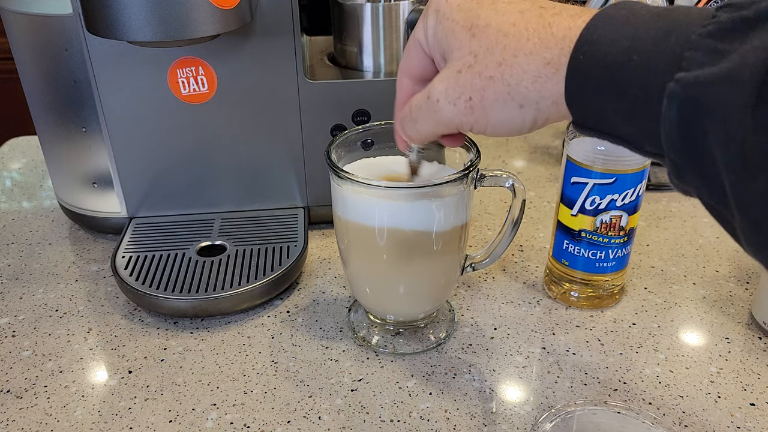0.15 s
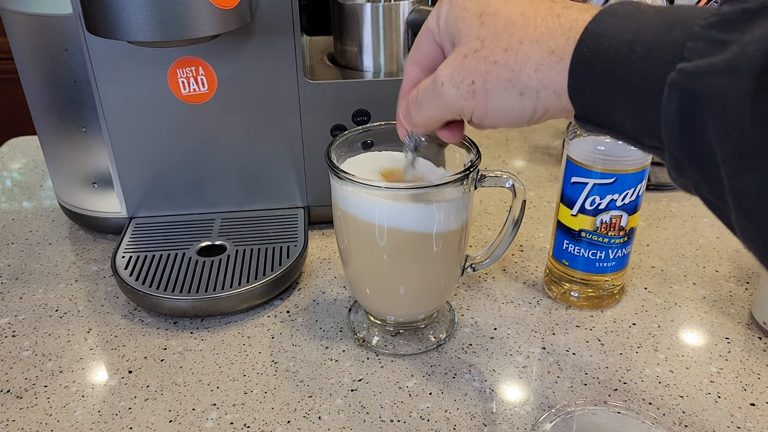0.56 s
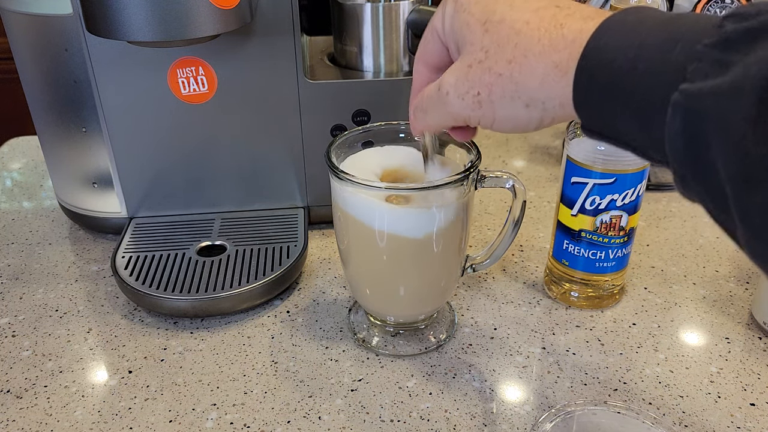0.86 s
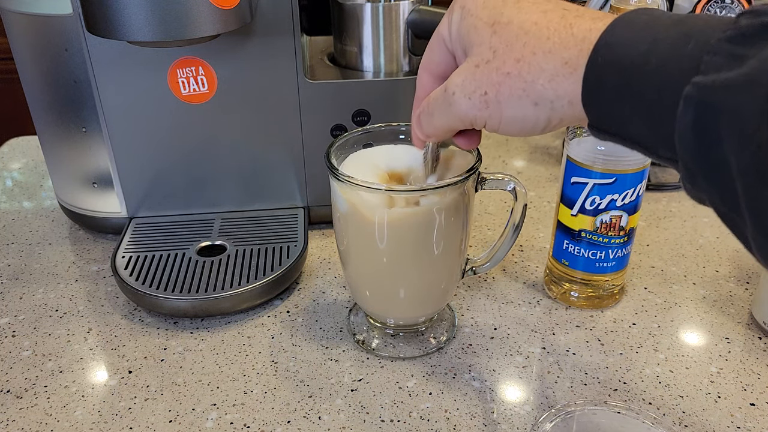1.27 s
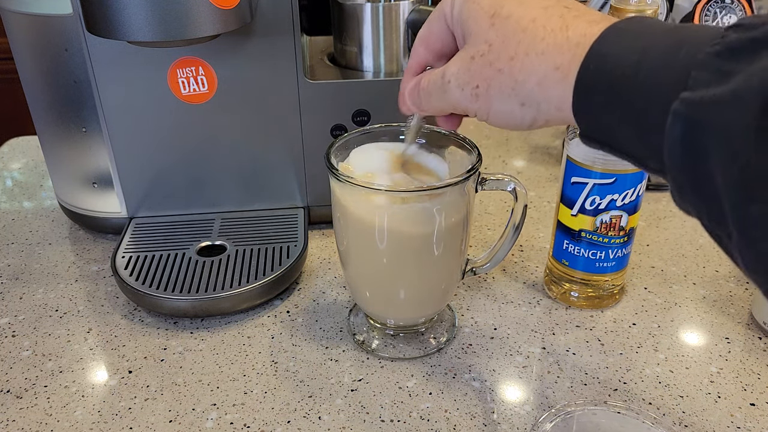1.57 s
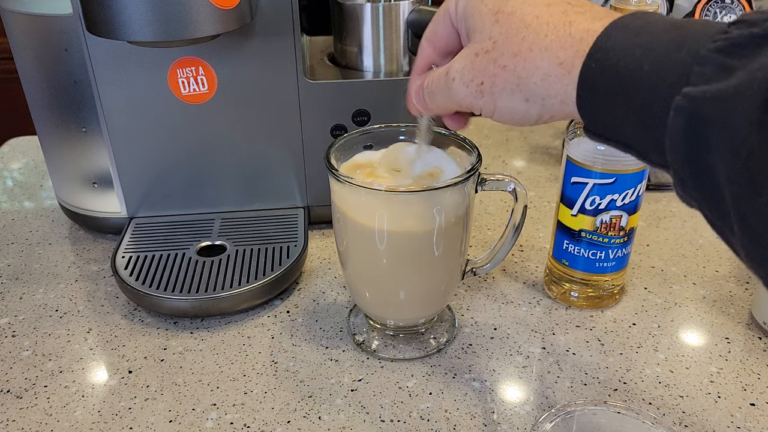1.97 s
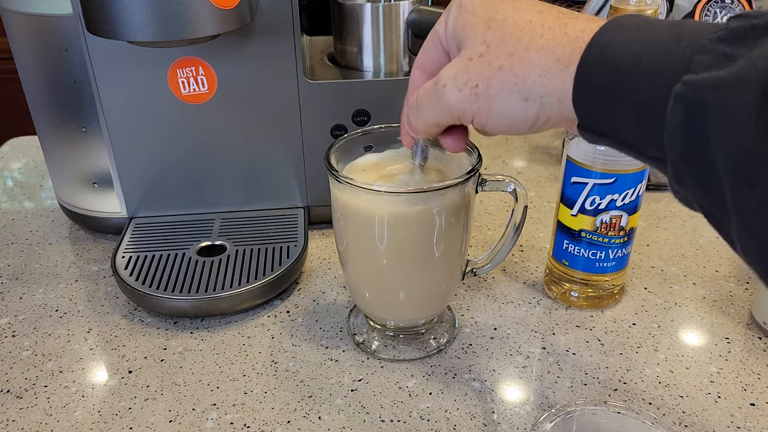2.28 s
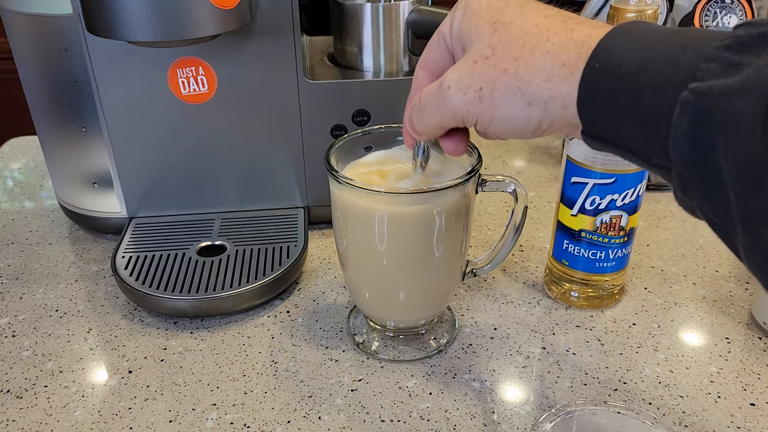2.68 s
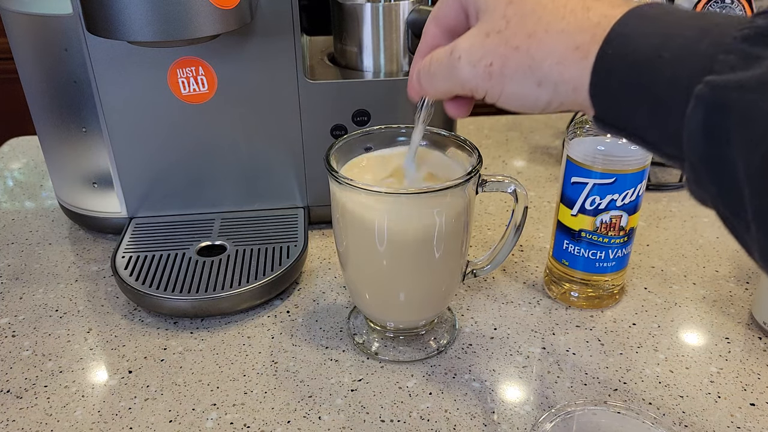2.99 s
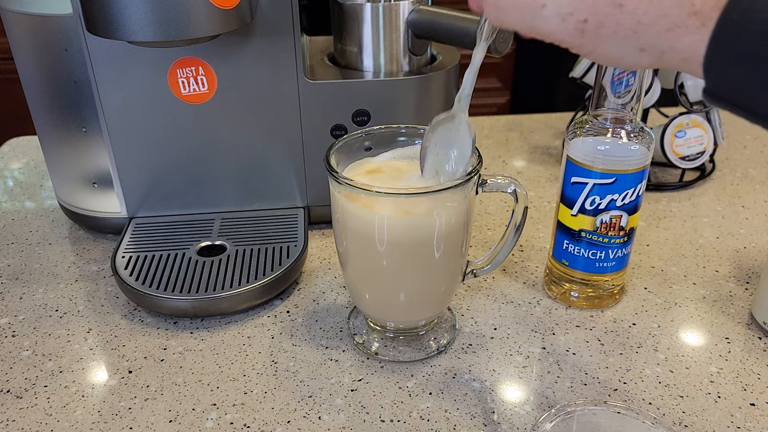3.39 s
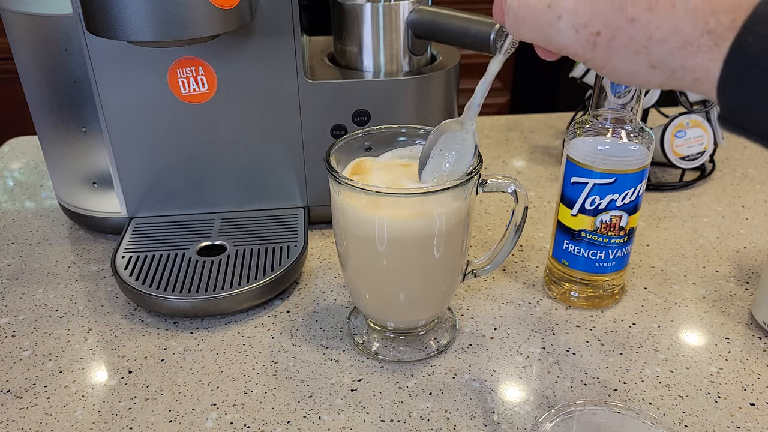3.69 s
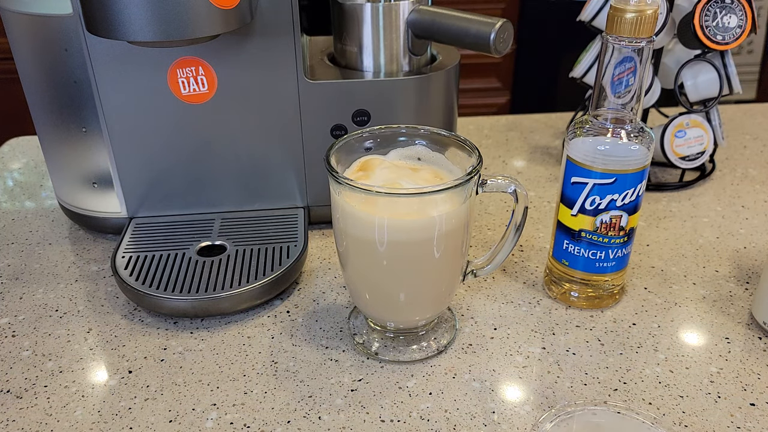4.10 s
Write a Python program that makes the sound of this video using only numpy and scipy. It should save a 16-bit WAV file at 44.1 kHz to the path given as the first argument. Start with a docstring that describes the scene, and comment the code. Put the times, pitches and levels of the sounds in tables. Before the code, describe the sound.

A metal spoon stirs a hot drink in a glass mug with quick, soft clinks, then taps three times on the rim.

```python
"""Quick, soft clinks circle in a glass: a metal spoon stirs a hot milky drink in a footed mug.
The spoon clinks on the wall and knocks dully along the bottom; the drink damps the glass to a short,
low ring. Then the spoon judders up the wall and is tapped three times on the rim, where it rings freely
and the foot clatters on the stone counter. A small kitchen answers each blow over a soft rumble."""
import sys
import numpy as np
from scipy import signal
from scipy.fft import rfft, irfft
from scipy.io import wavfile
from scipy.ndimage import uniform_filter1d

SR = 44100
rng = np.random.default_rng(int(sys.argv[2]) if len(sys.argv) > 2 else 0)


def unload_audio(sound):
    """Save the sound as a 16-bit wav file, at the path given as the first command line argument."""
    columns = np.transpose(np.atleast_2d(sound))
    # keep every value between -1 and 1, then stretch to whole-number steps
    steps = np.round(np.clip(columns, -1, 1) * 32767)
    wavfile.write(sys.argv[1], SR, steps.astype(np.int16))


N = 187425
AGE = np.arange(SR // 2) / SR   # seconds since a blow


def amp(db):
    """Decibels to gain."""
    return 10 ** (np.asarray(db) / 20)


def at_hz(points, hz):
    """Read a table on a log-frequency axis."""
    f, value = np.transpose(points)
    return np.interp(np.log(np.maximum(hz, 1)), np.log(f), value)


def decay(t60):
    """An envelope that falls 60 dB in t60 seconds."""
    return np.exp(-np.log(1000) * AGE / t60)


def low_pass(x, hz, order):
    """Roll off the treble above hz."""
    return signal.sosfilt(signal.butter(order, min(hz, .45 * SR), fs=SR, output="sos"), x)


def band_pass(x, low_hz, high_hz, order):
    """Roll off both sides of a band."""
    edges_hz = [low_hz, min(high_hz, .45 * SR)]
    return signal.sosfilt(signal.butter(order, edges_hz, "band", fs=SR, output="sos"), x)


def noise(spectrum, count, size):
    """Rows of coloured noise, rms 1."""
    colour = amp(at_hz(spectrum, np.fft.rfftfreq(size, 1 / SR)))
    x = irfft(rfft(rng.standard_normal((count, size))) * colour, size)
    return x / x.std()


def modal(modes, count, scatter_db):
    """One ring per blow; the point of contact weights the modes differently each time."""
    hz, db, t60 = np.transpose(modes)
    rings = np.sin(2 * np.pi * hz[:, None] * AGE) * decay(t60[:, None])
    return amp(db + scatter_db * rng.standard_normal((count, len(hz)))) @ rings


def burst(spectrum, count, t60, rise_s):
    """Many crowded, quickly damped modes: noise that swells at once and dies."""
    return noise(spectrum, count, len(AGE)) * decay(t60) * (1 - np.exp(-AGE / rise_s))


def play(times, levels_db, sounds):
    """Lay each sound at its time, with its loudest 3 ms at its level."""
    loudest = np.sqrt(uniform_filter1d(sounds[:, :2000] ** 2, 130, axis=1).max(axis=1))
    out = np.zeros(N + len(AGE))
    for s, gain, sound in zip(times, amp(levels_db) / loudest, sounds):
        start = int(np.clip(s * SR, 0, N))
        out[start:start + len(AGE)] += gain * sound
    return out[:N]


def room_tone():
    """A bed of soft rumble and hiss that drifts in level."""
    # The bed's colour. Each row: frequency in Hz, relative level in dB.
    colour = [(25, -51), (60, -20), (110, -18.5), (170, 0.5), (300, -4.5), (520, 1.5), (750, -10.5),
              (1100, -18.5), (1800, -39), (3000, -36), (5200, -27), (8000, -43.5), (16000, -57)]
    # Its fader ride. Each row: time in seconds, level in dB.
    ride = [(0, -54), (.65, -65.5), (2, -50), (3.2, -52), (4.25, -55.5)]
    s, level_db = np.transpose(ride)
    return amp(np.interp(np.arange(N) / SR, s, level_db)) * noise(colour, count=1, size=N)[0]


def kitchen(x):
    """Dense reflections from counter, cupboards and walls, each octave dying at its own rate."""
    # The reverb's length. Each row: frequency in Hz, t60 in seconds.
    tail_t60 = [(150, 0.35), (500, 0.34), (1200, 0.37), (5000, 0.44), (9000, 0.36), (15000, .22)]
    # How much the kitchen sends back. Each row: frequency in Hz, level in dB.
    send = [(100, -1), (400, -4.5), (860, -12.5), (1300, -3.5), (2500, -1.5), (6000, -10.5), (15000, -3.5)]
    hz = np.fft.rfftfreq(len(AGE), 1 / SR)
    spectrum = rfft(rng.standard_normal(len(AGE))) * amp(at_hz(send, hz))
    centres = np.geomspace(125, 16000, 8)
    response = 0
    for centre, solo in zip(centres, np.eye(len(centres))):
        envelope = decay(at_hz(tail_t60, centre)) * (1 - np.exp(-(AGE / 0.0022) ** 2))
        octave = irfft(spectrum * at_hz(np.c_[centres, solo], hz), len(AGE))
        response = response + octave * envelope / np.linalg.norm(envelope)
    return signal.fftconvolve(x, response)[:N]


def corner(x):
    """Standing waves between counter and cupboards pick up each blow and hum on after it."""
    # Each row: pitch in Hz, level against the direct sound in dB, t60 in seconds.
    standing_waves = [(132, -4, 0.44), (277, 1, .35), (364, -13, 0.13), (473, 2.5, 0.17), (751, -1.5, 0.48),
                      (1014, -5, .33), (1140, -11.5, 0.77), (1198, 1, .24), (1300, -22, 0.11),
                      (1475, -10, 0.1), (1678, 2.5, 0.12), (1960, -5, 0.21)]
    out = 0
    for hz, level_db, t60 in standing_waves:
        r = amp(-60 / (t60 * SR))   # decay per sample
        feed = (1 - r * r) / 2 * np.array([1, 0, -1])
        feedback = [1, -2 * r * np.cos(2 * np.pi * hz / SR), r * r]
        out = out + amp(level_db) * signal.lfilter(feed, feedback, x)
    return out


def thud(times, levels_db):
    """The push goes through the foot into the counter, which radiates no deep bass."""
    # The thud's colour. Each row: frequency in Hz, relative level in dB.
    colour = [(80, -23), (130, -5), (200, -12.5), (320, 4), (450, 2), (650, 4), (1000, 6), (2000, -13)]
    pushes = burst(colour, len(times), t60=0.038, rise_s=0.0016)
    return play(times, levels_db, band_pass(pushes, 160, 1600, order=3))


def glass(times, levels_db, contact_hz, swell_s, bump_db):
    """The wall gives way in a damped bump, then rings briefly; a soft contact dulls its upper modes."""
    # The filled mug's modes. Each row: pitch in Hz, relative level in dB, t60 in seconds.
    mug_modes = [(488.4, -33, 0.13), (723, -13, 0.043), (872, 2.5, 0.064), (1090, -2, 0.015),
                 (1230, -14.5, 0.045), (1281, -6, 0.022), (1460, -29, 0.097), (1909, -32.5, 0.034),
                 (2267, -29.5, 0.033), (2960, -29.5, 0.031), (3307, -33, 0.045), (3915, -37.5, .03)]
    bump_hz = 905 * np.exp(0.073 * rng.standard_normal((len(times), 1)))   # set by the spot that is hit
    bump = amp(bump_db) * np.sin(2 * np.pi * bump_hz * AGE) * decay(t60=0.019)
    rings = (bump + modal(mug_modes, len(times), scatter_db=3.5)) * (1 - np.exp(-AGE / swell_s))
    return play(times, levels_db, low_pass(rings, contact_hz, order=4))


def swirl():
    """The drink swishes round while the spoon skips over the bottom in tiny random bumps."""
    # The strength of the stirring. Each row: time in seconds, level of the swish in dB.
    stir = [(0, -58.5), (.6, -61.5), (.9, -58), (1.5, -52), (2.1, -56.5), (2.699, -51), (3.05, -50),
            (3.25, -54.5), (3.4, -67.5), (4.25, -75)]
    # The swish's colour. Each row: frequency in Hz, relative level in dB.
    colour = [(60, -9), (170, 2), (450, -0.5), (650, 10), (880, 1.5), (1100, 5.5), (1350, 4), (1700, -18.5),
              (2200, -44), (3000, -26.5), (5000, -45.5), (9000, -44), (16000, -65)]
    s, level_db = np.transpose(stir)
    swish = amp(np.interp(np.arange(N) / SR, s, level_db)) * noise(colour, count=1, size=N)[0]
    slots = np.linspace(0, s[-1], num=120)
    times = slots + rng.uniform(0, slots[1], len(slots))
    skips_db = np.interp(times, s, level_db) + 12 + 3 * rng.standard_normal(len(times))
    return swish + glass(times, skips_db, contact_hz=1680, swell_s=0.00022, bump_db=17)


def knocks(s, ring_db):
    """The round of the spoon's bowl bumps the glass without a tick."""
    return glass(s, ring_db, contact_hz=1780, swell_s=0.0015, bump_db=9.5) + thud(s, ring_db - 16.5)


def stirring_knocks():
    """The bowl often bumps the glass just before it reaches the wall, now and then just after."""
    # Each row: start in seconds, glass ring in dB.
    hits = [(0.367, -37.5), (0.827, -31), (0.932, -29.5), (1.022, -25.5), (1.055, -26), (1.116, -32.5),
            (1.202, -27.5), (1.306, -29.5), (1.505, -25.5), (1.594, -23), (1.698, -24.5), (1.789, -22),
            (1.995, -20), (2.196, -27.5), (2.398, -24), (2.596, -21.5), (2.795, -25.5), (2.821, -30.5)]
    return knocks(*np.transpose(hits))


def judder():
    """An even run of ever lighter knocks as the spoon is drawn up the wall, out of the drink."""
    start_s, gap_s, first_db, loss_db = 2.9035, 0.045, -27, 3.5
    touch = np.arange(7)
    return knocks(start_s + gap_s * touch, first_db - loss_db * touch)


def tick(spectrum, centres_hz, t60, boost_db):
    """Metal on glass: where the spoon is touched decides which of its resonances stands out."""
    cracks = burst(spectrum, len(centres_hz), t60, rise_s=0.00009)
    peaks = [band_pass(x, hz - 350, hz + 350, order=1) for x, hz in zip(cracks, centres_hz)]
    return cracks + amp(boost_db) * np.array(peaks)


def soften(ticks, levels_db):
    """A harder blow is a shorter contact, hence brighter; light touches lose their highest treble."""
    reference_hz, reference_db, db_per_octave = 11600, -28, 20.5
    top_hz = reference_hz * 2 ** ((levels_db - reference_db) / db_per_octave)
    return np.array([low_pass(x, hz, order=1) for x, hz in zip(ticks, top_hz)])


def wall_contacts(s, ring_db, tick_db, thud_db, centre_hz):
    """The edge of the spoon meets the wall and skips once; drink and fingers choke the metal at once."""
    # The colour of the sunken spoon's tick. Each row: frequency in Hz, relative level in dB.
    colour = [(300, -16), (1200, -6), (2200, -1.5), (2750, -29.5), (3800, -6), (4450, 4), (5200, -2),
              (5900, -7.5), (6750, 1), (7600, -3.5), (9000, 0), (10500, -9), (12800, -7.5), (13600, -18),
              (16000, -13)]
    cracks = tick(colour, centre_hz, t60=0.019, boost_db=2)
    metal = play(s, tick_db, soften(cracks, tick_db))
    rebound_s = s + rng.uniform(0.0018, 0.016, len(s))
    rebound_db = tick_db - 14.5
    rebounds = burst(colour, len(s), t60=0.043, rise_s=0.001)
    skip = play(rebound_s, rebound_db, soften(rebounds, rebound_db))
    ring = glass(s + 0.00031, ring_db, contact_hz=4230, swell_s=0.0015, bump_db=1.5)
    return metal + skip + ring + thud(s, thud_db)


def glances():
    """The edge glances off the wall, mostly half a turn after a clink, with a thud as loud as its tick."""
    # Each row: start in seconds, metal tick in dB, glass ring in dB.
    hits = [(0.1933, -49.5, -59), (0.4073, -47, -39), (0.5679, -52.5, -53), (0.7767, -45.5, -39),
            (0.9624, -39, -30), (1.1645, -43.5, -33), (1.3458, -38.5, -29.5), (1.5349, -34.5, -34),
            (1.7253, -31.5, -33), (1.9185, -32.5, -34), (2.015, -42, -22), (2.1349, -32.5, -50),
            (2.2098, -43.5, -35), (2.342, -34.5, -27.5), (2.5379, -37, -27), (2.7491, -43.5, -39.5)]
    s, tick_db, ring_db = np.transpose(hits)
    centre_hz = 5340 * 2 ** (0.056 * rng.standard_normal(len(s)))
    return wall_contacts(s, ring_db, tick_db, tick_db + 0.5, centre_hz)


def clinks():
    """Once a turn, about five times a second, the spoon meets the wall squarely: mostly glass."""
    # Each row: start in seconds, glass ring in dB, accented spoon resonance in Hz.
    hits = [(0.1096, -35.5, 4540), (0.293, -37, 4700), (0.4817, -38.5, 4900), (0.6834, -32, 4370),
            (0.8591, -31.5, 4300), (1.0457, -28, 5340), (1.2417, -20.5, 4250), (1.4358, -18.5, 6750),
            (1.629, -15, 6740), (1.831, -10.5, 3600), (2.0294, -21, 4800), (2.231, -23.5, 7200),
            (2.4316, -20.5, 4700), (2.607, -27, 7800), (2.8103, -28, 7900)]
    s, ring_db, centre_hz = np.transpose(hits)
    # The last few clinks are duller, with less metal tick against the glass ring.
    dull_from_s, dull_db_per_s = 2.18, 6
    tick_db = ring_db - 12.5 - dull_db_per_s * np.maximum(s - dull_from_s, 0)
    thud_db = -29.5 + 0.47 * (ring_db + 27)   # grows more slowly than the ring
    return wall_contacts(s, ring_db, tick_db, thud_db, centre_hz)


def rim_taps():
    """Three taps on the rim: the free spoon rings on, and the mug clatters on its foot."""
    # Each row: start in seconds; glass ring, metal tick, thud, spoon ring and foot clatter, all in dB;
    # accented spoon resonance in Hz.
    taps = [(3.2889, -9, -25, -32.5, -26, -25, 7300), (3.4504, -13, -23, -26.5, -28, -20, 8630),
            (3.608, -15, -20, -10.5, -25, -14, 4600)]
    # The colour of the tick on the rim. Each row: frequency in Hz, relative level in dB.
    colour = [(200, -24), (1200, 0.5), (2000, 6.5), (2600, 0), (3500, -8), (4500, 4.5), (5100, -2),
              (5600, 6.5), (6650, -15.5), (7300, 8), (8200, -1.5), (9900, -0.5), (10700, -14),
              (14000, -16.5), (16000, -20)]
    # The spoon ringing in the air. Each row: pitch in Hz, relative level in dB, t60 in seconds.
    spoon_modes = [(2240, -5, .09), (4123, -8, .14), (4555, -3, .05), (5480, -1, .13), (5575, -3, .07),
                   (7105, -1, .14), (7260, -2, .05), (7816, -6, .07), (9625, -7, .09), (10970, -16, .07),
                   (13490, -17, .11)]
    # The foot rattling on the stone. Each row: pitch in Hz, relative level in dB, t60 in seconds.
    foot_modes = [(436, -1.5, 0.062), (744, -0.5, 0.078), (1038, -7.5, 0.083), (1221, 6.5, 0.024),
                  (1402, 0.5, 0.022), (1730, -4, 0.016)]
    s, ring_db, tick_db, thud_db, spoon_db, foot_db, centre_hz = np.transpose(taps)
    metal = play(s, tick_db, tick(colour, centre_hz, t60=0.038, boost_db=-4))
    spoon = play(s, spoon_db, modal(spoon_modes, len(s), scatter_db=2.5))
    clatter = modal(foot_modes, len(s), scatter_db=0.5) * (1 - np.exp(-AGE / 0.0014))
    foot = play(s + 0.00052, foot_db, clatter)
    ring = glass(s + 0.002227, ring_db, contact_hz=3470, swell_s=0.00075, bump_db=1)
    return metal + spoon + foot + ring + thud(s, thud_db)


def scene():
    """Mug and spoon, their reflections and the quiet room."""
    stirring = clinks() + glances() + stirring_knocks() + swirl()
    mug = stirring + judder() + rim_taps()
    return mug + corner(mug) + kitchen(mug) + room_tone()


def record(dry):
    """Hard taps are rounded off; the microphone thins the deep bass; the top is cut steeply."""
    ceiling, low_cut_hz, high_cut_hz = 0.85, 85, 15900
    rounded = dry / (1 + (dry / ceiling) ** 6) ** (1 / 6)
    thin = signal.sosfilt(signal.butter(2, low_cut_hz, "high", fs=SR, output="sos"), rounded)
    return signal.sosfilt(signal.ellip(10, .1, 80, high_cut_hz, fs=SR, output="sos"), thin)


dry = scene()
out = record(dry)
unload_audio(out)
```